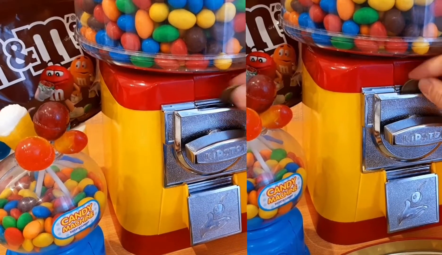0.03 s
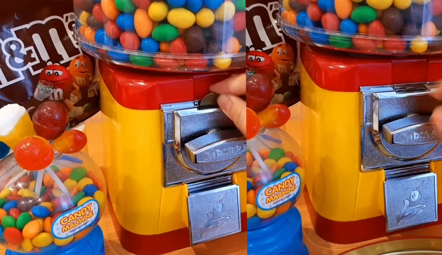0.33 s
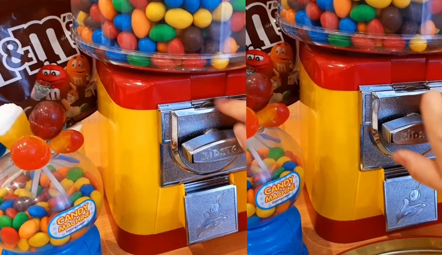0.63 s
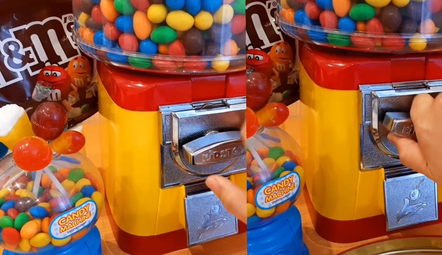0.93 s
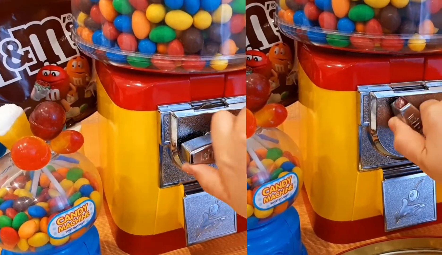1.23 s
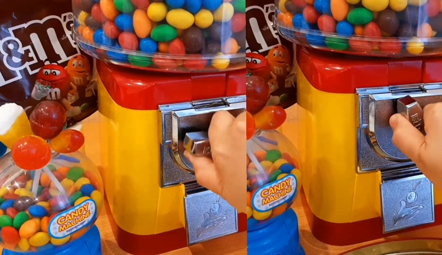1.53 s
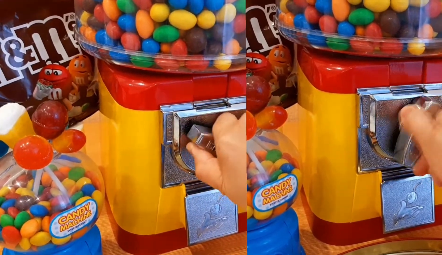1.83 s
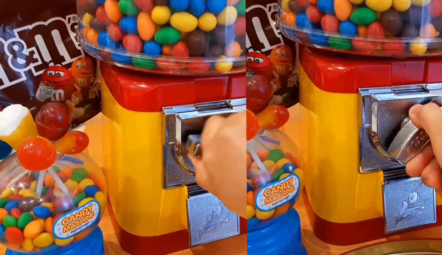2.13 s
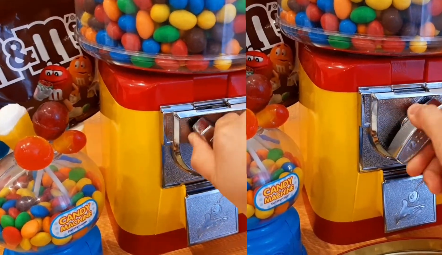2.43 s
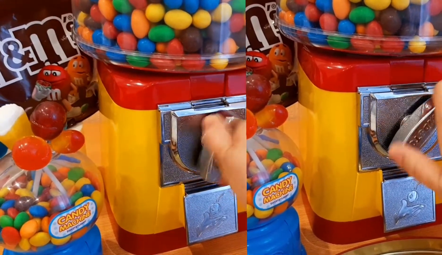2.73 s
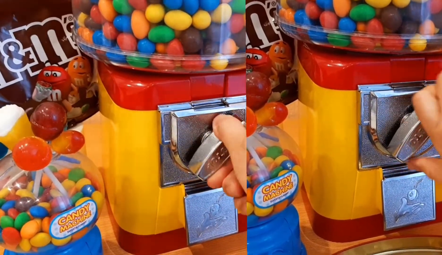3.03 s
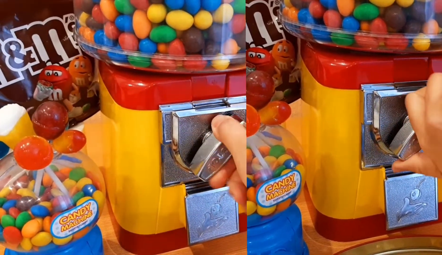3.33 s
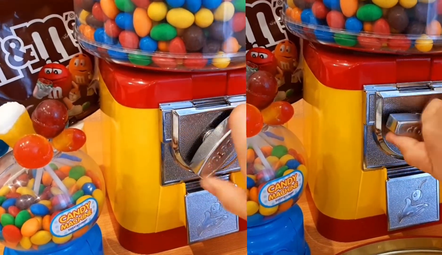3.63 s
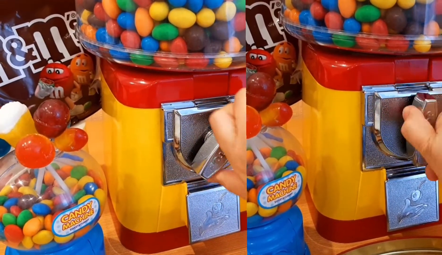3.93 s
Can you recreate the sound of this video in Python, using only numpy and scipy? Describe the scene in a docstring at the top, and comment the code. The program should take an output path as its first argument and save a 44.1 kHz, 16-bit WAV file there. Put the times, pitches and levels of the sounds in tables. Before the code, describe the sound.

A metal candy dispenser is cranked close by in a small, echoing room. A coin first taps into the slot, then drops inside, ringing. The ratchet snaps repeatedly while hard pieces clatter down the chute.

```python
"""A coin taps its way into the slot of a metal candy dispenser in a small, echoing room.
The crank is turned: the coin scrapes round and the shaft knocks. At about 1.4 seconds the coin drops
and tumbles inside, ringing. From 1.7 seconds the pawl (the ratchet's catch) snaps over its teeth and
thumps the housing, while loose pieces clatter down the chute. A quick run of snaps ends the scene."""
import sys
import numpy as np
from scipy import signal
from scipy.fft import rfft, irfft
from scipy.io import wavfile

SR = 44100
rng = np.random.default_rng(int(sys.argv[2]) if len(sys.argv) > 2 else 0)


def master(y):
    """Save y as 16-bit WAV."""
    cut = np.clip(np.atleast_2d(y).T, -1, 1)
    pcm = np.round(cut * 32767)  # scale
    wavfile.write(sys.argv[1], SR, pcm.astype(np.int16))


N = 176400

# Tone colours of the background, of each source and of its echo. Each row: frequency in Hz, gain in dB.
ROOM_TONE_COLOUR = [(15, -38.5), (30, -23), (60, -5), (100, 9.5), (200, -14), (350, -1.5), (560, -21),
                    (900, -6.5), (1500, -26), (2600, -23.5), (8000, -22.5), (15000, -23.5)]
RUB_COLOUR = [(40, -15), (125, 12.5), (200, 3.5), (340, 13.5), (550, -2), (900, 7.5), (1400, 0),
              (2200, 5.5), (4000, 1), (7000, -11.5), (15500, -32.5)]
KNOCK_COLOUR = [(60, -26), (350, 8), (560, -8), (810, 13), (1100, -2), (2100, 3), (2700, 0.5), (3400, 4.5),
                (5000, -7), (15500, -30.5)]
TAP_COLOUR = [(60, -11.5), (320, 1), (550, 0), (900, 4), (1500, -1), (2500, 0), (6500, 1), (11000, -3),
              (15500, -10.5)]
TAP_ECHO_COLOUR = [(50, -6.5), (130, 1), (210, -5.5), (330, 13.5), (550, -4), (900, 6.5), (1500, -7.5),
                   (2500, -3.5), (6500, -6), (11000, -16), (15500, -14.5)]
CHUTE_COLOUR = [(60, -27), (200, -15), (350, -1), (520, -10.5), (900, 11), (1300, -0.5), (2100, 11),
                (3200, 5.5), (4200, 2), (6000, 3), (9000, -12), (15500, -16.5)]
CHUTE_ECHO_COLOUR = [(60, -23.5), (350, -2), (550, -10), (900, -2.5), (1300, 0.5), (2200, 1), (4500, -3.5),
                     (9000, -19), (15500, -24)]
PAWL_COLOUR = [(60, 14), (300, 11.5), (600, 5.5), (1200, 2.5), (2800, 4.5), (5000, 3), (9500, -4),
               (12500, 0), (15500, -1.5)]
PAWL_ECHO_COLOUR = [(40, 3.5), (100, 4), (200, 10), (290, 11), (370, 11), (500, 3.5), (880, 8), (1300, 3),
                    (4500, 4.5), (7500, -1.5), (10000, -8), (12500, -3.5), (15500, -8.5)]
# How long the room echoes. Each row: frequency in Hz, fade time (t60, the time to fall 60 dB) in seconds.
ROOM_FADES = [(60, 0.484), (330, 0.392), (800, 0.277), (2000, 0.404), (5000, 0.384), (9000, 0.304),
              (15000, 0.285)]

# Modes are the tones a part rings with when struck; the coin also has fainter ones, its partials.
# Each row: frequency in Hz, level in dB, fade time in seconds.
SHAFT_MODES = [(801.7, 6, 0.0355), (868, -7, 0.063), (1348, -14, 0.076), (2059, -9.5, 0.043),
               (3430, -26, .03)]
SLOT_MODES = [(826, -26.5, 0.105), (906.8, -30.5, 0.099), (2087.5, -21.5, 0.11), (2622, -26, .08),
              (2674, -24.5, 0.093), (3805, -29.5, .08), (6100, -27.5, .06)]
CHUTE_MODES = [(798.5, -19.5, 0.094), (910.9, -20, 0.13), (993.5, -22, 0.0875), (1072.6, -32, 0.092),
               (1823, -18.5, 0.05), (1930.5, -20, 0.184), (2080, -23.5, 0.105), (2217, -16.5, 0.158),
               (2253, -16.5, 0.0664), (2908, -19.5, 0.125), (3030, -23.5, 0.106), (4410, -21.5, 0.051)]
PLATE_MODES = [(902.2, -8, 0.145), (1046, -8.5, 0.255), (2099, 4, 0.077), (2202.3, 5, 0.17),
               (2242, 4, 0.164), (2372, -5.5, 0.047)]
GUIDE_MODES = [(942, -11.5, 0.086), (2962, -1, 0.072), (3120, 0.5, 0.073), (3193, 3, 0.0467),
               (3370, 2.5, 0.055)]
HOUSING_MODES = [(66.5, -2, 0.0954), (102.05, 1, 0.084), (162.4, -4.5, 0.0548), (283.5, -2, 0.0707),
                 (351.53, -10, 0.299), (394.9, -12, 0.364)]
COIN_PARTIALS = [(6950, -11.5, 0.101), (8020, -25.5, 0.068), (10200, -24, 0.088), (12010, -26, .12),
                 (12600, -17.5, .1), (13760, -17, 0.084)]
# The coin's five main modes. Each row: frequency in Hz, fade time in seconds.
COIN_MODES = [(3779, 0.2716), (6600, 0.0006), (7533, 0.1833), (8613, 0.1028), (13750, 0.1355)]

# How strongly coin and crank rub. Each row: time in seconds, level in dB.
RUB_LEVELS = [(0, -62.5), (.15, -75), (.25, -94.5), (.37, -77), (0.411, -52), (.5, -67.5), (.6, -92),
              (0.859, -72.5), (0.938, -48.5), (1.0, -59.5), (1.131, -40.5), (1.26, -54.5), (1.33, -53),
              (1.6, -43), (2.04, -54), (2.33, -45), (2.4, -39.5), (3.2, -45.5), (4, -47)]
# Dull knocks of the shaft, then light taps of coin and handle.
# Each row: start in seconds, level in dB, tilt in dB per octave (more tilt sounds brighter).
SHAFT_KNOCKS = [(.753, -57.5, 0.5), (1.271, -36.5, -2), (1.277, -15.5, 2.5), (1.286, -24, -1),
                (2.294, -26.5, -4)]
SLOT_TAPS = [(.033, -24, 0), (.047, -16, 2.5), (0.061, -15.5, 1), (.065, -17.5, 0.5), (.077, -16.5, 0),
             (.093, -16, -0.5), (.120, -29, 3.5), (.275, -33.5, -1), (0.397, -56, -16.5),
             (0.404, -37.5, -0.5), (0.421, -36.5, -5.5), (.431, -38, -1.5), (.444, -17.5, 0.5),
             (0.481, -33, 6), (.499, -36.5, -3.5), (.703, -49, -3.5), (0.857, -56.5, 3.5), (.869, -50, 6.5),
             (0.932, -40.5, -6), (.978, -50.5, -5), (1.007, -45, -0.5), (1.019, -37.5, -1),
             (1.062, -21.5, -1.5), (1.131, -28, -3.5), (1.205, -46.5, -2.5), (1.567, -32, 4),
             (2.234, -27.5, -3.5), (2.345, -16.5, -2), (2.361, -19.5, -1.5), (3.122, -14, 0.5),
             (3.134, -16.5, 3), (3.378, -30, 2)]
# Pieces strike the chute.
# Each row: start in seconds, level in dB, tilt in dB per octave, extra level for the ringing in dB.
CHUTE_HITS = [(1.365, -4.5, -1.5, -1.5), (1.392, -4.5, 0, -3.5), (1.399, -8.5, 0.5, -1),
              (1.415, -12, -3, -0.5), (1.429, -15.5, -0.5, 3.5), (1.442, -4, -0.5, -9),
              (1.453, -12, -1.5, -3), (1.464, -9, 0, 4), (1.473, -9, 0.5, 2), (1.490, -24, -5, 1),
              (1.511, -23, -1, 6), (1.592, -18, 0, 2), (1.614, -13.5, 0.5, -13.5), (1.937, -28, -5.5, -4),
              (2.267, -30.5, 1.5, -5), (2.381, -20, 0.5, -5), (2.419, -2.5, 2.5, -11), (2.4433, -6, 2, -3),
              (2.468, -1.5, 0, -1.5), (2.481, -8, 2.5, -16), (2.488, -3, 0.5, -1), (2.521, -5, 3, 3.5),
              (2.535, -13, 0, -9.5), (2.562, -11.5, 1.5, -7.5), (2.571, -22.5, -3.5, 4),
              (2.594, -14, 1, -5.5), (2.619, -14, -1.5, -9), (2.686, -27.5, -7.5, -1),
              (2.785, -17, -2, 6.5), (2.828, -15.5, 0.5, 3.5), (2.857, -11.5, 1, 1.5), (2.868, -14, 0.5, 0),
              (2.951, -19.5, 3, -18), (2.960, -7, 0, -3), (3.025, -15.5, 0.5, 3), (3.068, -17, -0.5, -5.5),
              (3.082, -18.5, -5, -2.5), (3.141, -19, -1, 4.5), (3.192, -18, -0.5, 3), (3.215, -7, 0, 0),
              (3.223, -12, 2, -3), (3.258, -4.5, 0.5, -0.5), (3.283, -15.5, 1.5, 3.5), (3.310, -17, 1, -2),
              (3.338, -16.5, -2, -9)]
# Hits on a loose plate in the chute and on the coin's steel guide. Each row: start in seconds, level in dB.
PLATE_HITS = [(2.961, -33.5), (3.216, -19), (3.258, -21.5), (3.284, -30)]
GUIDE_HITS = [(1.3655, -18), (1.394, -17.5), (1.443, -24), (1.465, -23), (1.614, -30), (2.420, -21.5),
              (2.4445, -22.5), (2.469, -20)]
# The coin rings freely. Each row: start in seconds, then a level in dB for each main mode.
COIN_RINGS = [(1.441, -23, -45.5, -18.5, -32.5, -24.5), (1.594, -52.5, -58.5, -41, -55.5, -53),
              (2.488, -19, -42, -25.5, -9, -26.5), (2.515, -38.5, -4, -13, -36, -21.5),
              (2.618, -53, -50, -24, -43, -48), (2.867, -32.5, -40, -31, -28, -32.5),
              (3.025, -54, -55, -33.5, -45.5, -50), (3.222, -50, -45, -22, -28.5, -39),
              (3.310, -56.5, -53.5, -34, -30, -50)]
# The pawl snaps over a tooth. Each row: start in seconds, level in dB, tilt in dB per octave,
# thump level in dB, extra level for the echo and hollow ring in dB.
PAWL_SNAPS = [(1.6595, -8.5, -0.5, -21, 1), (1.8264, -8, 0.5, -27.5, 1.5), (2.0779, -6.5, 0.5, -21.5, -0.5),
              (2.504, -16.5, 0, -22.5, 2), (2.6319, -7, 0, -21.5, -2.5), (2.747, -9, 1.5, -20, -0.5),
              (2.9744, -9.5, 1, -21.5, -0.5), (3.408, -6, 0.5, -27, 0), (3.5078, -5.5, 1, -29.5, -2),
              (3.6021, -8, 1, -30, 0.5), (3.686, -7, -0.5, -19.5, -3.5), (3.7424, -8, -0.5, -26, -3),
              (3.8259, -7.5, 1, -23, -2), (3.917, -11.5, -0.5, -29, -0.5)]


def amp(db):
    """Turn decibels into a gain."""
    return 10 ** (np.asarray(db) / 20)


def rms_one(x):
    """Scale a sound to an average (rms) level of 1."""
    return x / np.sqrt(np.mean(x ** 2) + 1e-20)


def at_hz(points, hz):
    """Read between a table's rows, with octaves evenly spaced."""
    f, v = np.transpose(points)
    return np.interp(np.log(np.maximum(hz, 1)), np.log(f), v)


def add(out, s, x):
    """Mix x into out, starting at s seconds."""
    i = max(int(s * SR), 0)
    out[..., i:i + x.shape[-1]] += x[..., :max(N - i, 0)]


def colour(x, points, size=4096):
    """Give a sound a tone colour, using a filter that never rings ahead of a hit."""
    gains = amp(at_hz(points, np.fft.rfftfreq(size, 1 / SR)))
    cepstrum = irfft(np.log(gains))
    cepstrum[1:size // 2] *= 2
    cepstrum[size // 2 + 1:] = 0
    response = irfft(np.exp(rfft(cepstrum)))
    return signal.fftconvolve(x, response[None], axes=1)[:, :N]


def stereo_noise(likeness, size):
    """White noise for two channels, the more alike the nearer likeness is to 1."""
    mid, side = rng.standard_normal((2, size))
    return (np.sqrt(1 + likeness) * mid + np.sqrt(1 - likeness) * side * [[1], [-1]]) / np.sqrt(2)


def room_tone(level_db=-75.5):
    """A faint, low, steady noise fills the room."""
    return amp(level_db) * rms_one(colour(stereo_noise(0.92, N), ROOM_TONE_COLOUR))


def room_echo(x, shorten=1, likeness=0.376, build_s=0.00677, size=26460):
    """The room's echo builds quickly, then each frequency band fades at its own pace."""
    t, hz = np.arange(size) / SR, np.fft.rfftfreq(size, 1 / SR)
    noise, tail = rfft(stereo_noise(likeness, size)), 0
    for (_, t60), share in zip(ROOM_FADES, np.eye(len(ROOM_FADES))):
        band = at_hz([(f, w) for (f, _), w in zip(ROOM_FADES, share)], hz)
        fade = amp(-60 * t * shorten / t60) * (1 - np.exp(-t / build_s))
        tail = tail + irfft(noise * band, size) * fade / np.sqrt(np.sum(fade ** 2))
    return signal.fftconvolve(x, tail, axes=1)[:, :N]


def contacts(rows, t60, hold_s, likeness, rise_s=0.00078, trim_db=-4.5, size=2048):
    """Each contact is a short burst of metal chatter that swells, holds and dies."""
    out, t = np.zeros((2, N)), np.arange(size) / SR
    fade = np.minimum(t / rise_s, 1) * amp(-60 * np.maximum(t - hold_s, 0) / t60)
    envelope = np.sqrt(np.sum(fade ** 2) * fade)
    octaves = np.log2(np.maximum(np.fft.rfftfreq(size, 1 / SR), 700) / 3000)
    for s, db, tilt, *_ in rows:
        burst = stereo_noise(likeness, size) * fade
        flat_spectrum = np.exp(1j * np.angle(rfft(burst)))
        add(out, s, amp(db + trim_db) * envelope * irfft(flat_spectrum * amp(tilt * octaves)))
    return out


def ring(hz, t60, phase_spread, swell_s=0.00106, size=22050):
    """One fading tone reaches the two microphones slightly out of step."""
    t = np.arange(size) / SR
    phase = phase_spread * rng.choice([-1, 1]) * np.array([[1], [-1]]) + rng.uniform(0, np.pi)
    return np.sin(2 * np.pi * hz * t + phase) * amp(-60 * t / t60) * (1 - np.exp(-t / swell_s))


def strike(hits, modes, spread_db, phase_spread, detune):
    """Every hit rings all of a part's modes, each a little different in strength and pitch."""
    out = np.zeros((2, N))
    for s, db in hits:
        for hz, mode_db, t60 in modes:
            gain = amp(db + mode_db + spread_db * rng.standard_normal())
            pitch = hz * (1 + detune * rng.standard_normal())
            add(out, s, gain * ring(pitch, t60, phase_spread))
    return out


def crank(grains_per_s=2500, grain_spread_db=4):
    """The shaft knocks in its bearing, and the coin carrier rubs in tiny random clicks."""
    hits = contacts(SHAFT_KNOCKS, t60=0.019, hold_s=0.00733, likeness=0.53)
    shaft = strike([(s, db) for s, db, _ in SHAFT_KNOCKS], SHAFT_MODES,
                   spread_db=2, phase_spread=0.167, detune=0.0116)
    knocks = colour(hits, KNOCK_COLOUR) + shaft
    starts = rng.random(N) < grains_per_s / SR
    strengths = amp(grain_spread_db * np.minimum(rng.exponential(1, N), 5))
    grains = rms_one(starts * strengths * stereo_noise(0.85, N))
    rub_db = np.interp(np.arange(N) / SR, *np.transpose(RUB_LEVELS))
    rub = colour(grains * amp(rub_db), RUB_COLOUR)
    return knocks + amp(-11.5) * room_echo(knocks) + amp(2) * rub + amp(-1.5) * room_echo(rub)


def slot_taps(body_db=-19):
    """Light touches of coin and handle ring the slot plate and the housing's higher modes."""
    hits = contacts(SLOT_TAPS, t60=0.0315, hold_s=0.00132, likeness=0.178)
    body = strike([(s, db + body_db - tilt) for s, db, tilt in SLOT_TAPS], HOUSING_MODES[3:],
                  spread_db=1.5, phase_spread=0.2, detune=0.04)
    plate = strike([(s, db - tilt) for s, db, tilt in SLOT_TAPS], SLOT_MODES,
                   spread_db=3, phase_spread=0.18, detune=0.0023)
    echo = colour(room_echo(hits, shorten=1.513), TAP_ECHO_COLOUR)
    return colour(hits, TAP_COLOUR) + echo + body + plate


def coin(pan_db=3.21):
    """The tumbling coin rings high and bangs on its steel guide, left of centre."""
    direct = strike([(s, max(levels)) for s, *levels in COIN_RINGS], COIN_PARTIALS,
                    spread_db=0.5, phase_spread=0.62, detune=0.00103)
    for s, *levels in COIN_RINGS:
        for (hz, t60), db in zip(COIN_MODES, levels):
            add(direct, s, amp(db) * ring(hz, t60, phase_spread=0.475))
    direct += strike(GUIDE_HITS, GUIDE_MODES, spread_db=0.5, phase_spread=0.29, detune=0.0034)
    return direct * amp([[pan_db], [-pan_db]]) + amp(-18.5) * room_echo(direct)


def chute():
    """Hard pieces bounce down the metal chute, ringing both it and a loose plate."""
    hits = contacts(CHUTE_HITS, t60=0.03, hold_s=0.003768, likeness=0.518)
    rings = strike([(s, db + ring_db) for s, db, _, ring_db in CHUTE_HITS], CHUTE_MODES,
                   spread_db=2.5, phase_spread=0.6, detune=0.00213)
    plate = strike(PLATE_HITS, PLATE_MODES, spread_db=2, phase_spread=0.23, detune=0.00083)
    return colour(hits, CHUTE_COLOUR) + colour(room_echo(hits), CHUTE_ECHO_COLOUR) + rings + plate


def hollow_ring(start_hz=270.04, rise_hz=129.45, rise_s=0.03999, t60=0.282, trim_db=-18, size=17640):
    """The hollow housing rings after each snap, its pitch rising as it fades."""
    out, t = np.zeros((2, N)), np.arange(size) / SR
    hz = start_hz + rise_hz * (1 - np.exp(-t / rise_s))
    fade = amp(-60 * t / t60) * (1 - np.exp(-t / 0.0053))
    for s, db, _, _, after_db in PAWL_SNAPS:
        pitch = hz * (1 + 0.02396 * rng.standard_normal())
        phase = 2 * np.pi * np.cumsum(pitch) / SR + 0.5 * rng.standard_normal((2, 1))
        add(out, s, amp(db + after_db + trim_db) * fade * np.sin(phase))
    return out


def ratchet(thump_lag_s=0.001996):
    """The pawl snaps over a tooth, the housing thumps just after, and the room echoes both."""
    chatter = dict(t60=0.031, hold_s=0.00183, likeness=0.247)
    snaps = contacts(PAWL_SNAPS, **chatter)
    echo_feed = contacts([(s, db + extra, tilt) for s, db, tilt, _, extra in PAWL_SNAPS], **chatter)
    thump = strike([(s + thump_lag_s, db) for s, _, _, db, _ in PAWL_SNAPS], HOUSING_MODES,
                   spread_db=0.5, phase_spread=0.302, detune=0.01994)
    echo = colour(room_echo(echo_feed), PAWL_ECHO_COLOUR) + amp(-15.5) * room_echo(thump)
    return colour(snaps, PAWL_COLOUR) + thump + echo


def scene(pan_db=0.85, right_lag_s=0.00009):
    """The dispenser stands close and slightly left, so its right channel is later and softer."""
    left, right = slot_taps() + ratchet() + hollow_ring() + chute() + crank()
    right = np.roll(right, round(right_lag_s * SR))
    dispenser = np.array([left * amp(pan_db), right * amp(-pan_db)])
    return room_tone() + dispenser + coin()


def record(dry, low_cut_hz=39.5, high_cut_hz=15900):
    """The microphone drops the deepest bass; peaks are rounded and the highest treble is cut."""
    low_cut = signal.butter(3, low_cut_hz, "high", fs=SR, output="sos")
    high_cut = signal.ellip(10, 0.2, 70, high_cut_hz, fs=SR, output="sos")
    rounded = 1.1 * np.tanh(signal.sosfilt(low_cut, dry) / 1.1)
    return signal.sosfilt(high_cut, rounded)


dry = scene()
out = record(dry)
master(out)
```